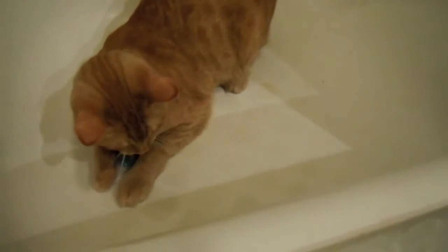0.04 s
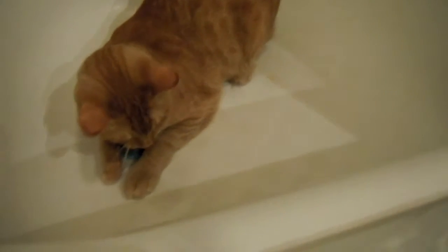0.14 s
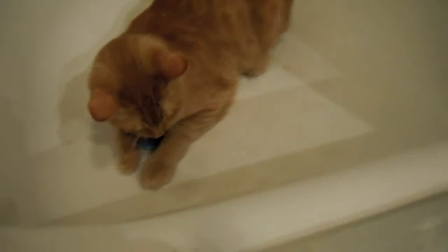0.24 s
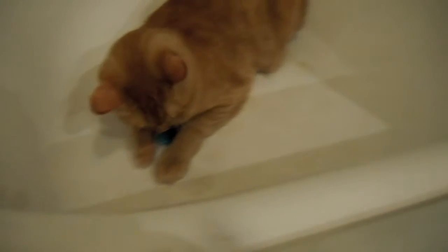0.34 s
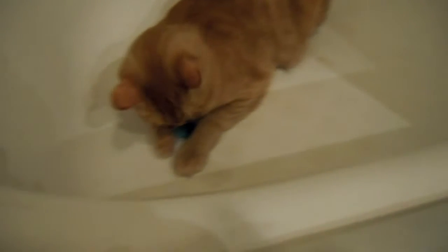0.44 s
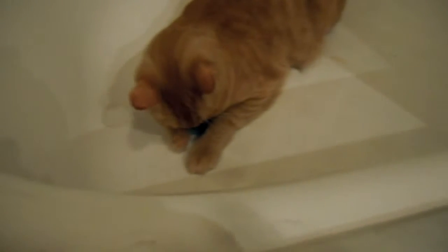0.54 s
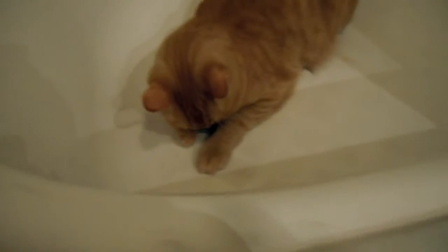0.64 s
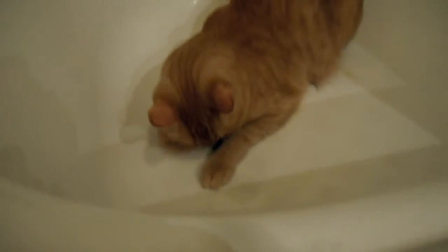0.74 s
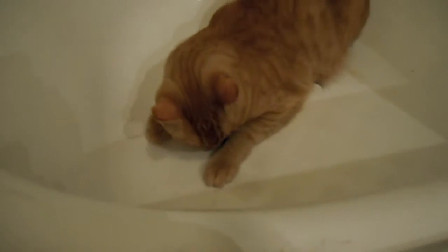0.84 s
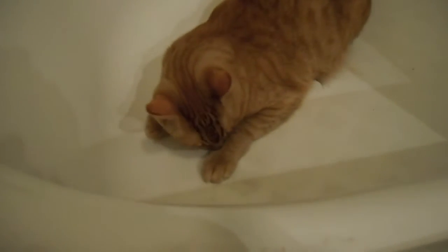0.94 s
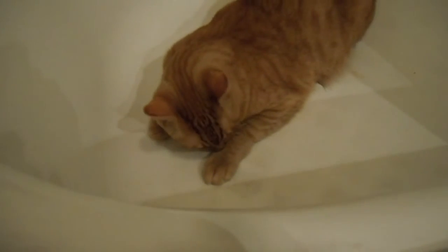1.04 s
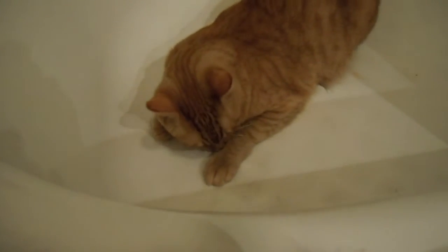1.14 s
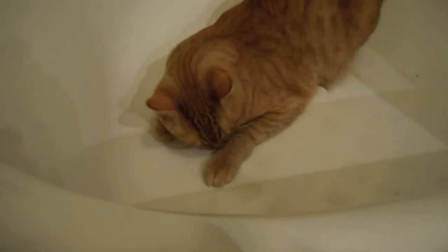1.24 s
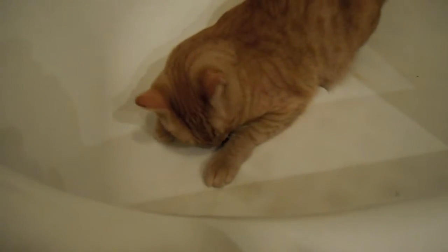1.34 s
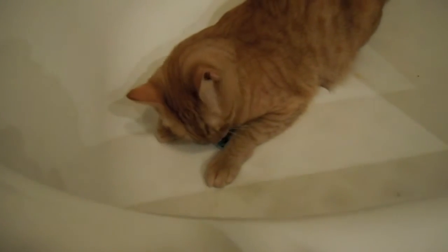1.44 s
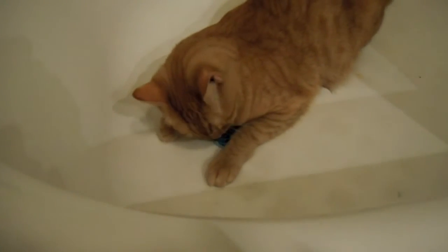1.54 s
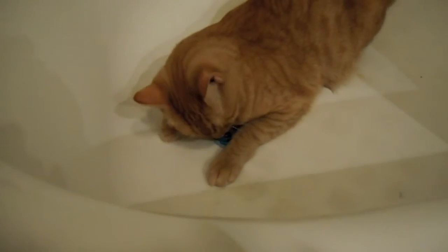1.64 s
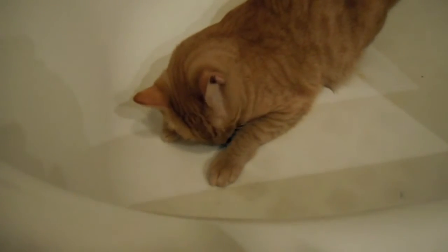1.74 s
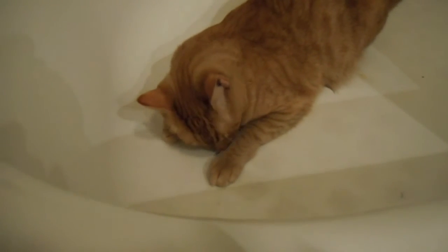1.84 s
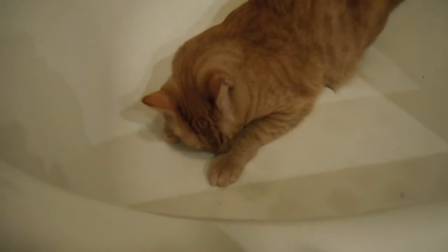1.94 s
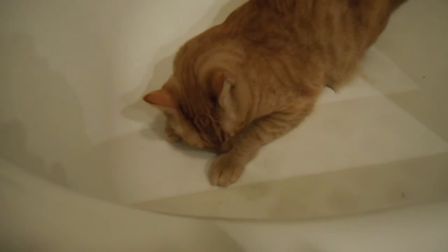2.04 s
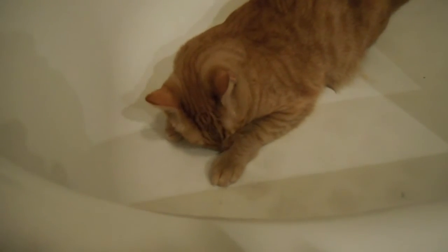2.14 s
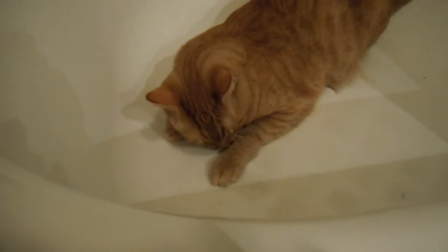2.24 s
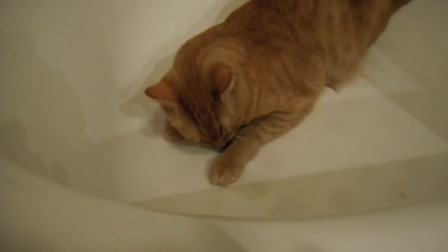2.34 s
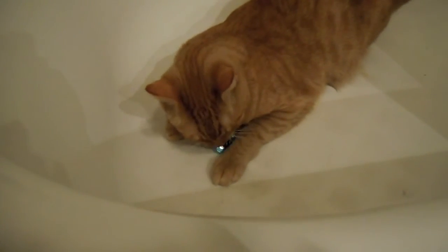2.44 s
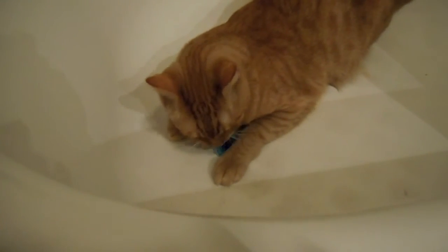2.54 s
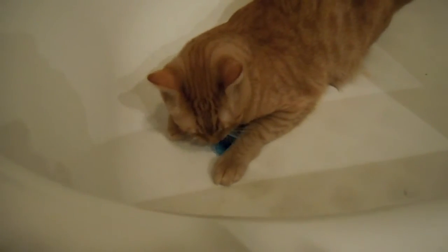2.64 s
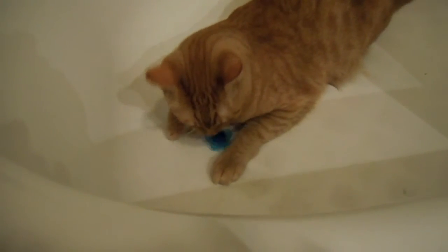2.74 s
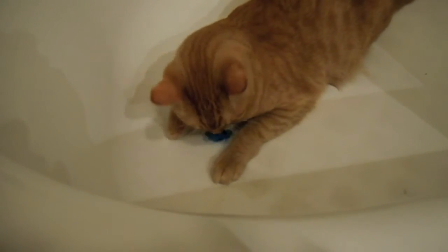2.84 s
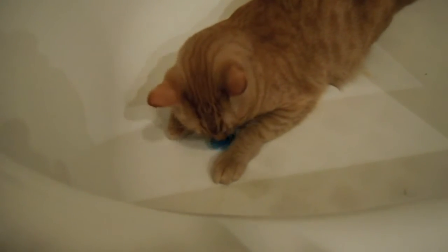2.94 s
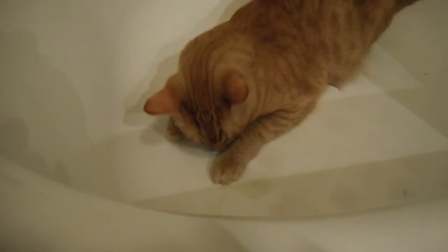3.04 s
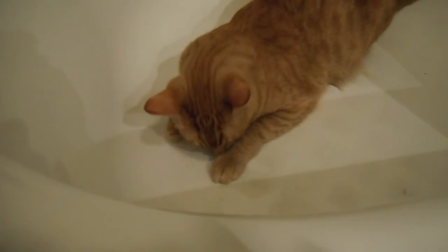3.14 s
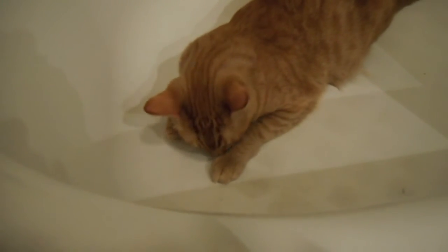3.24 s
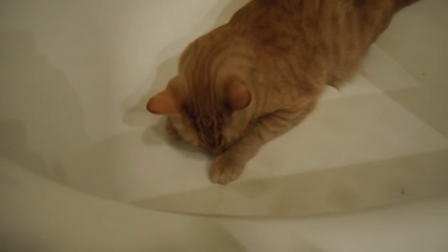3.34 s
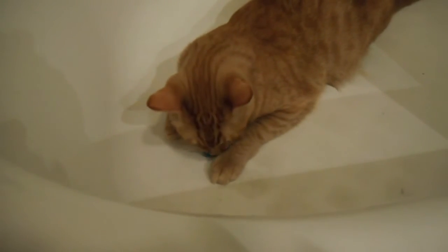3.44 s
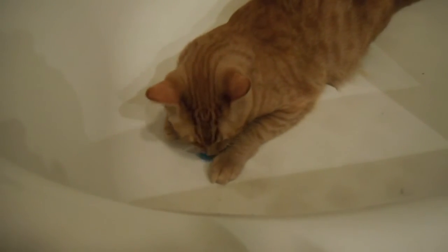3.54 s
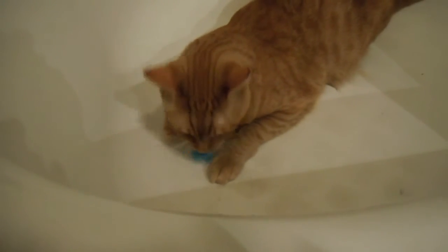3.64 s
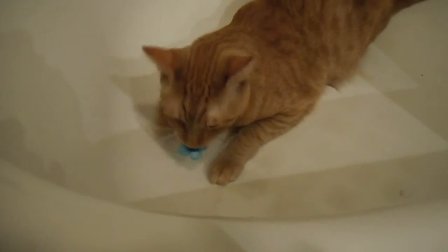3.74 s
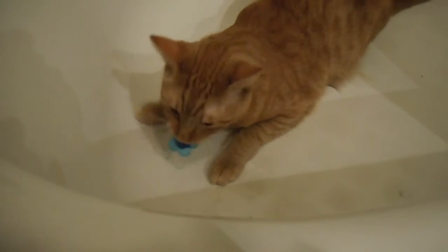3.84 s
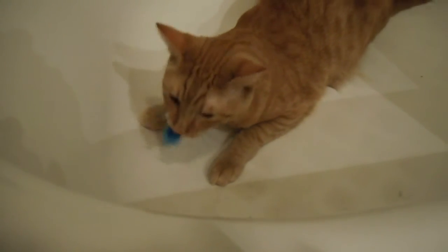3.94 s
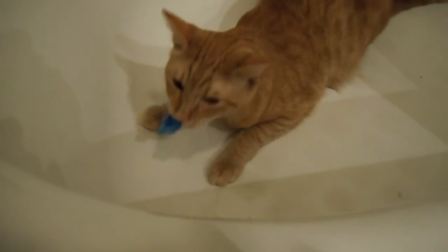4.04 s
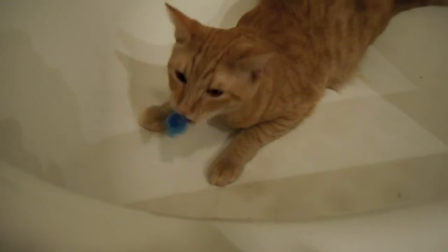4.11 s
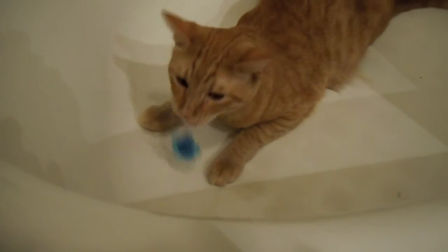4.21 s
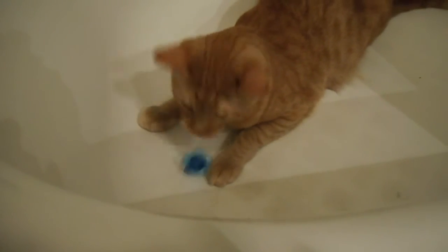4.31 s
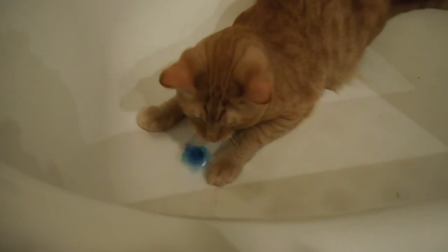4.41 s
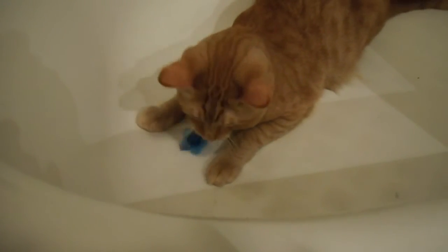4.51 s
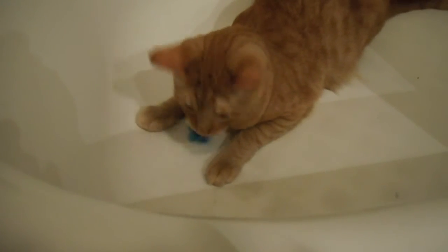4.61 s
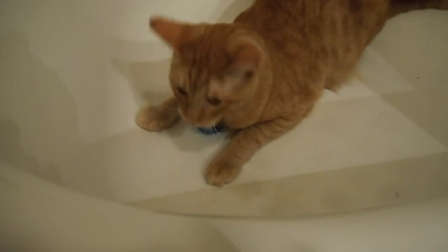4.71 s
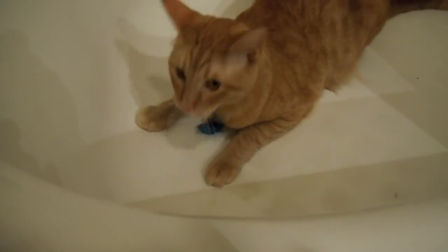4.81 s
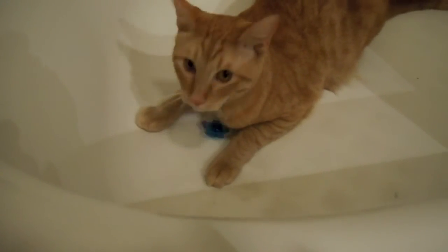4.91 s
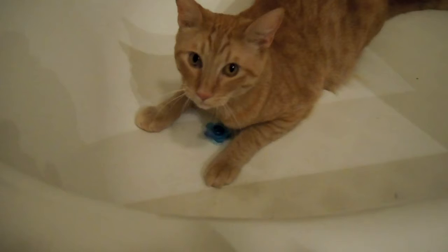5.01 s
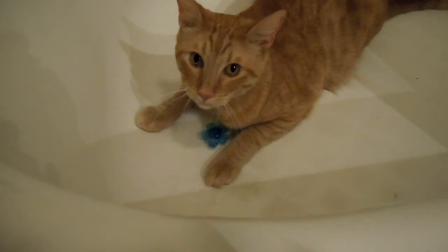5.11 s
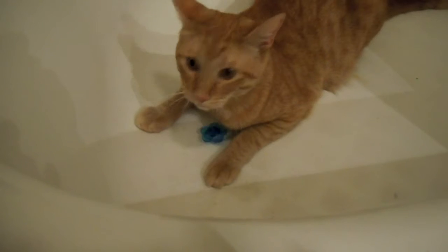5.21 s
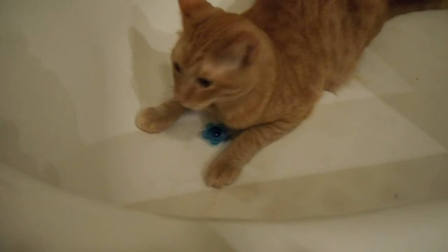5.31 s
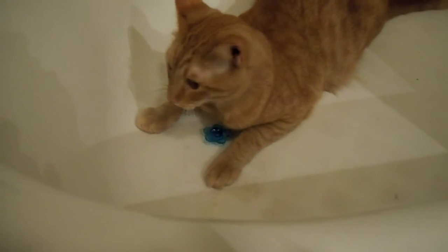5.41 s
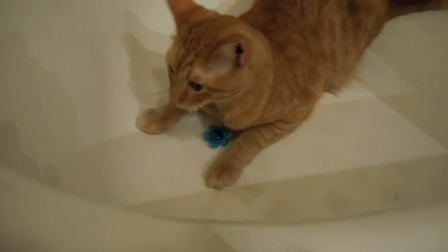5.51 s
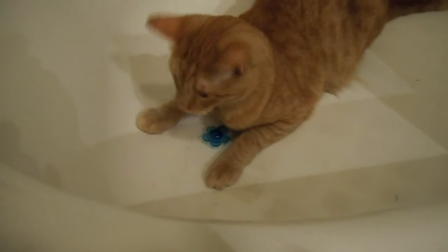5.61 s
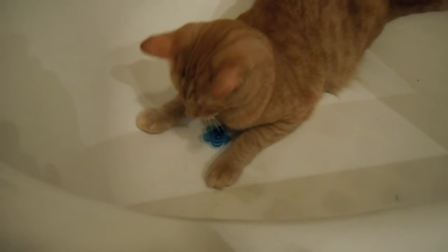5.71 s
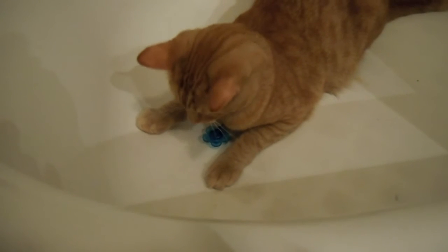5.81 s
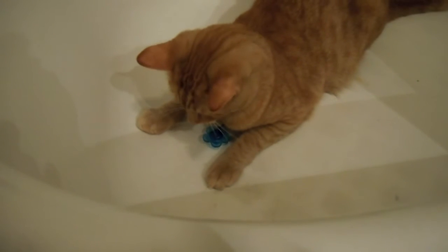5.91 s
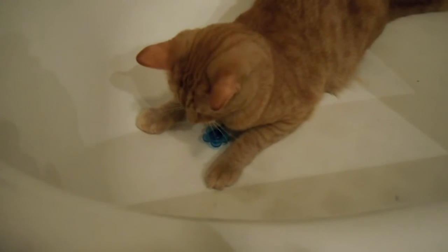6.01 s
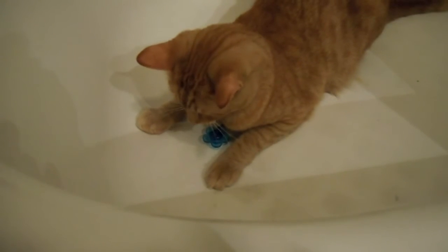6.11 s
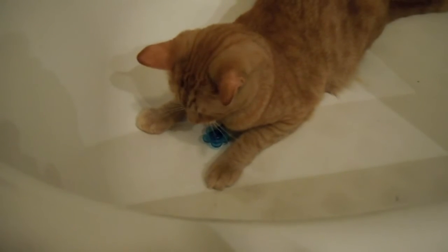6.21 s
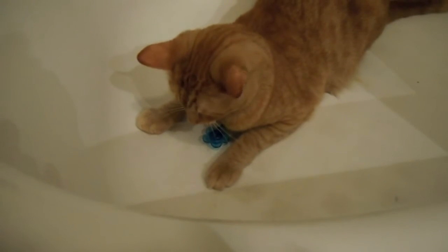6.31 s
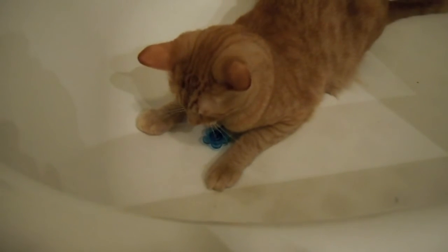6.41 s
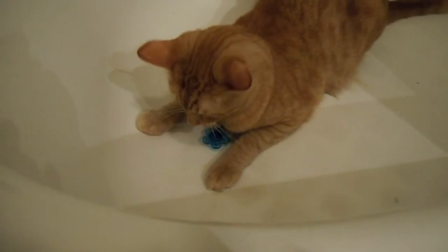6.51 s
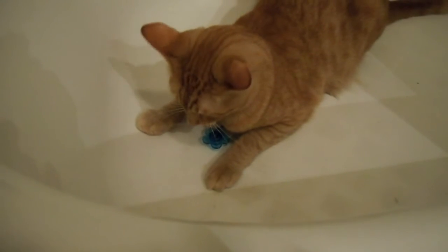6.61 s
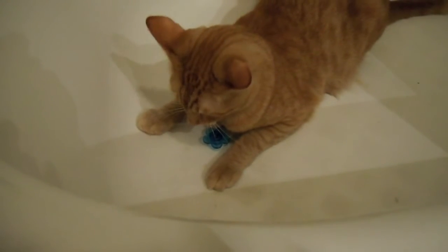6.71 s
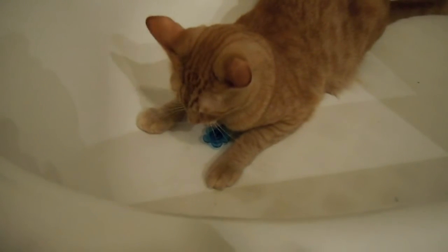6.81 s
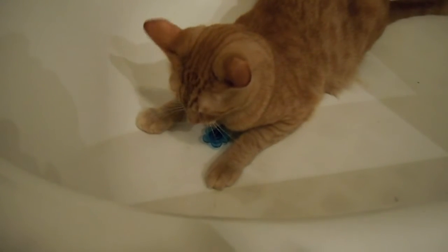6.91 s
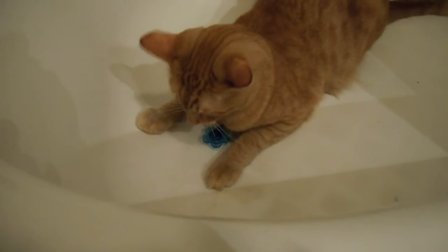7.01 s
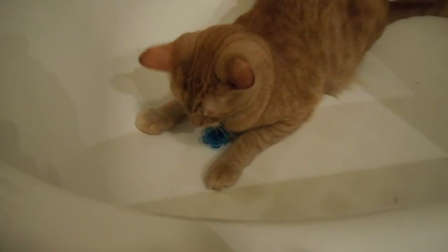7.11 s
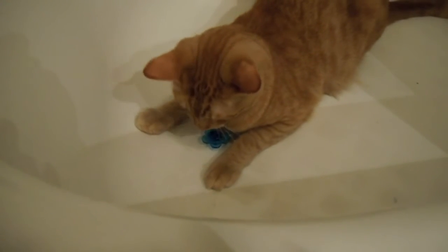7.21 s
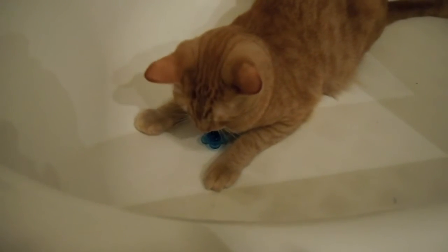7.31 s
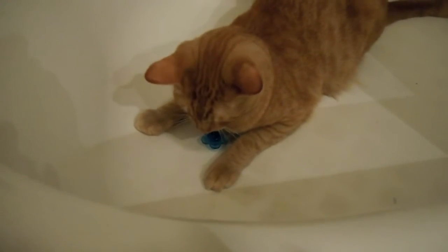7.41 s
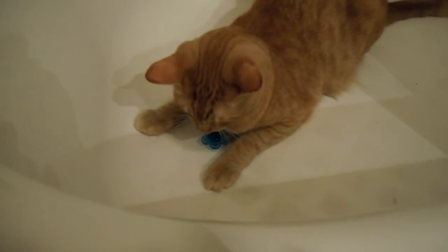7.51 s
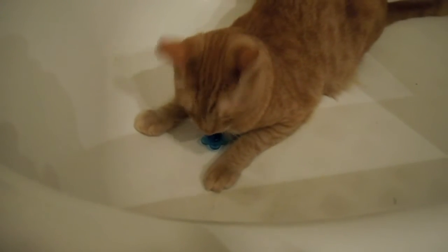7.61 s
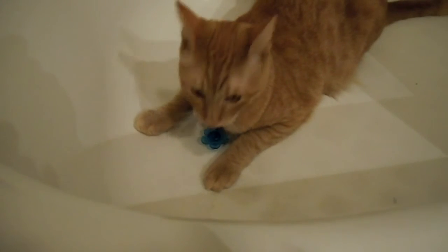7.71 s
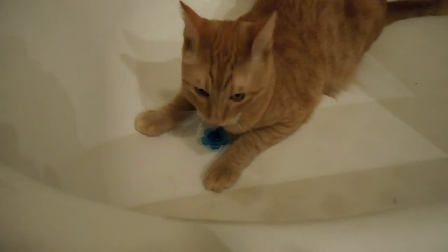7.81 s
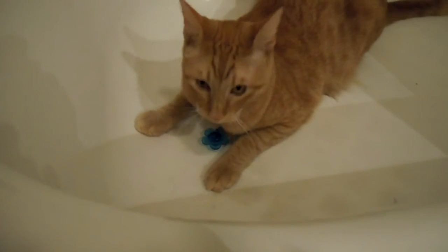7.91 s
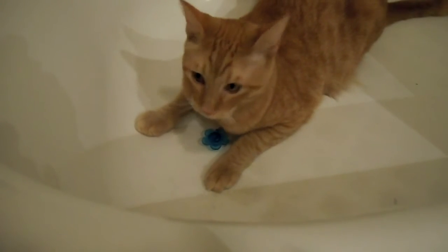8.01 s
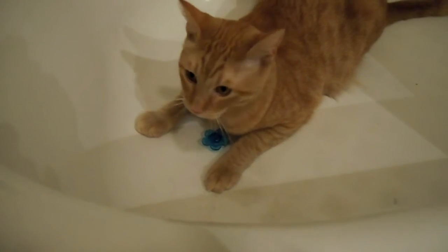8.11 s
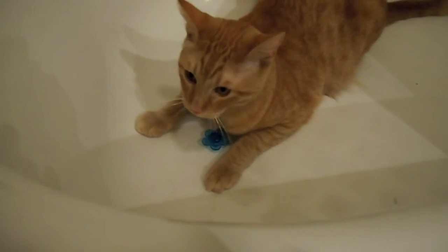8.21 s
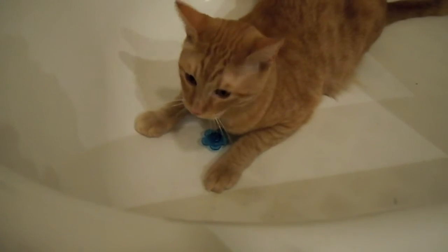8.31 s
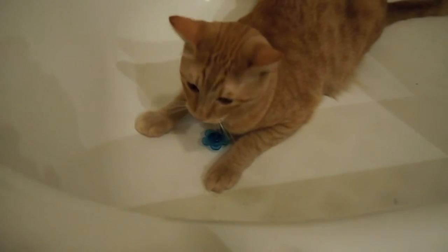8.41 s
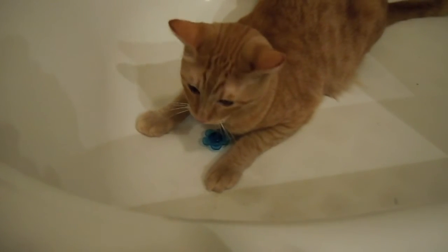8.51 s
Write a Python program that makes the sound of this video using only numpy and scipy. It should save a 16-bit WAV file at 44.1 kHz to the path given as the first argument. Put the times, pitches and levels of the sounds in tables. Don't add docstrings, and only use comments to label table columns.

```python
import sys
import numpy as np
from scipy import signal
from scipy.io import wavfile
from scipy.ndimage import uniform_filter1d

SR = 44100
rng = np.random.default_rng(int(sys.argv[2]) if len(sys.argv) > 2 else 0)


def wav_record(signal):
    frames = np.transpose(np.atleast_2d(signal))
    bounded = np.clip(frames, -1, 1)
    quanta = np.round(bounded * 32767).astype(np.int16)
    wavfile.write(sys.argv[1], SR, quanta)


def to_linear_factor(level_db):
    exponent = np.asarray(level_db, float) / 20
    return 10 ** exponent


N = 377055
LEAD_SAMPLES, RING_SAMPLES = 4410, 6000

# start_s, crack_db
DROP = (4.2908, 25.4)
DROP_S, DROP_DB = DROP


def read(points, hz):
    point_hz, value = np.transpose(points)
    return np.interp(np.log(hz + 1), np.log(point_hz + 1), value)


def evened(x):
    return x / np.sqrt(np.mean(x ** 2) + 1e-20)


def camera_db(t):
    rest_db, early_dip_db, duck_db = 1.19, 3, 13
    fall_s, hold_until_s, recover_s = 0.27, 5.07, 0.74
    early = np.exp(-np.maximum(t, 0) / recover_s)
    sink = 1 - np.exp(-np.maximum(t - DROP_S, 0) / fall_s)
    left = np.exp(-np.maximum(t - hold_until_s, 0) / recover_s)
    return rest_db - early_dip_db * early - duck_db * sink * left


def silence(*shape):
    return np.zeros((*shape, N + LEAD_SAMPLES + RING_SAMPLES))


def place(track, start_s, sound):
    at = round((start_s + .0008) * SR) + LEAD_SAMPLES
    track[at:at + len(sound)] += sound / to_linear_factor(camera_db(start_s))


def noise(db_at, patchy_db):
    # hz, correlation
    likeness = [(60, 0.84), (150, 0.97), (360, 0.99), (900, 0.98), (2200, 0.92), (5430, 0.77),
                (13400, 0.056)]
    # hz, left_minus_right_db
    balance = [(60, 1.0), (180, 2.3), (520, 1), (1540, 0.12), (4530, 0.32), (13400, 0.54)]
    hz = np.fft.rfftfreq(2048, 1 / SR)
    a, b, c, d, patches = rng.standard_normal((N // 512 + 5, 1025, 5)).T
    patches = uniform_filter1d(patches, 16, 0)
    patches = evened(uniform_filter1d(patches, 8, 1))
    same = np.clip(read(likeness, hz), 0, 1)[:, None]
    left = a + 1j * b
    right = same * left + np.sqrt(1 - same ** 2) * (c + 1j * d)
    lean_db = np.array([.5, -.5])[:, None, None] * read(balance, hz)[:, None]
    spectrum_db = db_at(hz)[:, None] + patchy_db * patches + lean_db
    bins = np.array([left, right]) * to_linear_factor(spectrum_db)
    return evened(signal.istft(bins, nperseg=2048, noverlap=1536)[1][:, :N])


def tones(lines, waver):
    t = np.arange(N) / SR
    out = np.zeros((2, N))
    for hz, db, lead_rad in lines:
        drift = np.interp(t, np.arange(100) / 10, rng.standard_normal(100))
        strength = np.sqrt(2) * to_linear_factor(db) * (1 + waver * drift)
        out += strength * np.sin(2 * np.pi * hz * t + np.array([[lead_rad], [0]]))
    return out


def click(colour):
    log_gain = np.log(to_linear_factor(read(colour, abs(np.fft.fftfreq(2048, 1 / SR)))))
    phase = -signal.hilbert(log_gain).imag
    x = np.fft.ifft(np.exp(log_gain + 1j * phase)).real[:1024]
    return x / abs(x).max()


def ring(modes, strike, detune):
    t = np.arange(RING_SAMPLES) / SR
    out = np.zeros(RING_SAMPLES)
    for (hz, db, t60_s), a, b in zip(modes, strike, detune):
        decay = to_linear_factor(db + 2.5 * a - 60 * t / t60_s)
        out += decay * np.sin(2 * np.pi * hz * (1 + 0.0023 * b) * t)
    return (1 - np.exp(-t / .0008)) * out


def fan():
    # hz, db_per_hz
    air_spectrum = [(20, -6.5), (60, -17), (110, -17.5), (200, -14.5), (330, -7.5), (450, -9), (560, -12),
                    (1100, -10), (1770, -17.5), (3500, -19.5), (5500, -23), (8700, -20.5), (11800, -28),
                    (13000, -32.5), (14000, -37)]
    # centre_hz, width_hz, boost_db
    duct_modes = [(150, 38.6, 15), (255.7, 17, 6.5), (307.5, 18, 8), (361.4, 37, 8), (429.8, 16, 11.5),
                  (647, 22, 6), (902, 15, 4), (912, 10, -11.5), (1053.5, 13.3, 10), (1117, 14, 6),
                  (1669, 17, 14.5), (2390, 70, 6)]
    # pitch_hz, level_db, left_lead_rad
    motor_lines = [(241, -53.5, .2), (366.4, -55.5, .2), (482, -56, .2), (597, -56.5, .2), (721, -56.5, .2),
                   (876, -62, .2)]
    # pitch_hz, level_db, left_lead_rad
    hum_lines = [
        (120, -50.5, -.18),
        (12855, -52.5, 1.9),
    ]

    def wash_db(hz):
        duct_db = sum(db / (1 + (2 * (hz - f) / width_hz) ** 2) for f, width_hz, db in duct_modes)
        return read(air_spectrum, hz) + duct_db

    wash = to_linear_factor(-38) * noise(wash_db, patchy_db=0.76)
    return wash + tones(motor_lines, waver=0.18) + tones(hum_lines, waver=.12)


def bumps():
    # start_s, length_s, centre_hz, width_hz, level_db
    house_bumps = [
        (3.65, .4, 160, 50, -42),
        (6.1, .4, 70, 40, -51),
        (6.05, .35, 175, 60, -49),
        (7.75, .35, 165, 50, -49),
    ]
    out = silence()
    for start_s, length_s, hz, width_hz, db in house_bumps:
        t = np.arange(round(length_s * SR)) / SR
        pole = np.exp(-np.pi * width_hz / SR)
        slow = signal.lfilter([1], [1, -pole], rng.standard_normal((2, SR)))[:, -len(t):]
        rumble = slow[0] * np.cos(2 * np.pi * hz * t) + slow[1] * np.sin(2 * np.pi * hz * t)
        place(out, start_s, to_linear_factor(db) * evened(rumble) * signal.windows.tukey(len(t), .5))
    return out


def paws():
    # start_s, level_db
    presses = [(1.057, -23.5), (1.086, -36), (1.301, -34), (2.03, -28), (2.037, -22.5), (2.065, -29),
               (2.105, -31), (2.124, -38), (2.724, -18), (3.33, -27.5), (3.36, -33)]
    # pitch_hz, level_db, t60_s
    tub_modes = [(349.4, -2, 0.27), (396.7, 0, 0.18), (620, 5, 0.031), (700, -16, 0.033), (1020, -4, 0.06)]
    out = silence()
    for start_s, db in presses:
        place(out, start_s, to_linear_factor(db - 12.5) * ring(tub_modes, *rng.standard_normal((2, 12))))
    return out


def bathroom(x):
    # hz, t60_s
    room_decay = [(200, 0.34), (600, 0.23), (1500, 0.37), (4000, 0.25), (8000, 0.25), (13000, 0.27)]
    # hz, side_below_mid_db
    echo_width = [(200, -16.5), (1000, -30), (2500, -30), (5000, -12), (9000, -3.5), (13000, -3)]
    # hz, gain_db
    echo_colour = [(200, -0.5), (1500, -0.5), (6000, -3.5), (9500, 1.5), (11500, -3.5), (14000, -9.5)]
    t = np.arange(SR // 2) / SR
    build_up = np.clip((t - .002) / 0.0046, 0, 1)
    turn_rad = np.arange(len(x)) / SR * 9.0
    out = 0
    for k in range(3):
        hz, s, (mid, side) = signal.stft(rng.standard_normal((2, len(t))), SR, nperseg=128)
        side = side * to_linear_factor(read(echo_width, hz))[:, None]
        fade_db = read(echo_colour, hz)[:, None] - 60 * s / read(room_decay, hz)[:, None]
        bins = np.array([mid + side, mid - side]) * to_linear_factor(fade_db)
        tail = signal.istft(bins, SR, nperseg=128)[1][:, :len(t)] * build_up
        tail = tail / np.linalg.norm(tail[0])
        share = np.sqrt(2 / 3) * np.cos(turn_rad + k * np.pi / 3)
        out = out + signal.fftconvolve((x * share)[None], tail, axes=1)[:, :len(x)]
    return out


def tub_walls(x):
    # delay_s, level_db
    wall_echoes = [
        (.0013, -8),
        (.0021, -10),
        (.0058, -8),
        (.0079, -14),
    ]
    return sum(to_linear_factor(db) * np.roll(x, round(delay_s * SR)) for delay_s, db in wall_echoes)


def toy():
    # start_s, tick_db, thud_db, low_ring_db, rim_db (extra upper ring,
    # landing on the rim)
    enamel_hits = [
        (-.03, -11.5, -19.5, -35, 1.5),
        (4.2908, 10.5, -15.5, -6, 6.5),
                   (1.059, -23, -27, -52, -14), (2.0367, -16, -22, -54, -18), (2.724, -12, -10, -35, -1),
                      (2.8738, -17, -32, -38, 4), (3.272, -24, -34, -54, -6), (3.2855, -23, -30, -52, -4),
                      (4.4402, -18, -14, -34, 4), (4.4469, -11, -20, -38, 2), (4.47, 2, -19, -29, 0),
                      (4.5407, -30, -34, -38, 8), (4.5625, -29, -24, -39, 6), (4.5772, -34, -34, -36, 4),
                      (4.597, -6, -23, -25, -6), (4.636, -11, -28, -33, -1), (4.6977, -28, -30, -34, 13),
                      (4.7344, -40, -29, -41, 15)]
    # start_s, tick_db, thud_db, low_ring_db
    rimless_hits = [(0.05, -28, -51, -41.5), (0.1344, -36, -44, -52), (0.3894, -46, -43, -45),
                    (2.03, -36, -34, -60), (2.1, -42.5, -31, -55), (2.5117, -31.5, -31.5, -48),
                    (2.7406, -14, -17, -44), (2.8059, -29.5, -29.5, -40), (2.829, -34, -39, -38),
                    (2.8834, -40, -27, -51), (2.9047, -34.5, -40, -47), (2.9674, -42.5, -38, -52),
                    (3.1067, -34, -37, -42), (3.2104, -44, -46, -52), (3.3294, -34.5, -28, -61),
                    (3.3544, -35, -30, -62), (3.3794, -37, -47, -63), (3.4097, -35, -34, -57),
                    (3.506, -38, -37, -55), (4.1096, -30.5, -50, -55.5), (4.1424, -36.5, -45, -50.5),
                    (4.4842, -18, -40.5, -34), (4.4763, -11, -40.5, -43), (4.9866, -36.5, -63, -53),
                    (5.01, -46.5, -57, -52), (5.3576, -49, -63, -57)]
    # pitch_hz, level_db, t60_s
    ring_groups = [
        [(3725, -8, .05), (3755, -5, .06), (3848, 0, .07), (3905, -3, .05), (5375, -24, .04)],
        [(6697, -10, .02), (7155, 0, .022), (7390, -2, .03)],
        [(9184, -8, .015), (9415, 0, .022), (9964, -9, .012), (10650, -7, .018), (12900, -12, .01)],
    ]
    # hz, level_db
    tick_colour = [(2000, -45), (5500, -24), (7200, -5), (9000, 0), (11000, -6), (13000, -12), (17000, -22)]
    # hz, level_db
    thud_colour = [(150, -31.5), (350, -4), (800, 3.5), (1500, 2.5), (3600, 1), (4500, -10), (6000, -6),
                   (9000, -23)]
    # hz, level_db
    crack_colour = [(200, -36.5), (650, -22.5), (1600, -16), (3300, -7), (4000, -4), (5200, -5), (7200, -3),
                    (9400, -4.5), (13800, -17.5), (17000, -31)]
    ticks, thuds, rings, crack = silence(4)
    tick, thud = click(tick_colour), click(thud_colour)
    for start_s, tick_db, thud_db, low_db, *rim in enamel_hits + rimless_hits:
        chance = rng.standard_normal((2, 14))
        rim_db = sum(rim)
        middle_db = -18 + 0.68 * tick_db + rim_db
        high_db = -16 + 0.78 * tick_db + 0.64 * rim_db
        stiffen = 1 + .001 * (np.clip(tick_db, -27, 0) + 12)
        modes = []
        for group, group_db in zip(ring_groups, (low_db, middle_db, high_db)):
            for hz, db, t60_s in group:
                modes.append((hz * stiffen if hz < 6000 else hz, db + group_db, t60_s))
        place(rings, start_s, ring(modes, *chance))
        chatter = np.convolve(tick, np.exp(-np.arange(28) / 12) * chance.ravel())
        place(ticks, start_s, to_linear_factor(tick_db) * chatter / abs(chatter).max())
        place(thuds, start_s, to_linear_factor(thud_db) * thud)
    place(crack, DROP_S, to_linear_factor(DROP_DB) * click(crack_colour))
    return ticks, thuds, rings, crack


def scene():
    ticks, thuds, rings, crack = toy()
    pads = paws()
    direct = ticks + crack + to_linear_factor(-4) * thuds + rings + pads
    walls = tub_walls(ticks + crack)
    left = to_linear_factor(2.5) * direct + walls
    right = to_linear_factor(0.6) * direct + np.roll(walls, shift=1)
    to_room = to_linear_factor(-0.5) * ticks + to_linear_factor(1.0) * crack + to_linear_factor(10.0) * thuds + to_linear_factor(-2.0) * rings + pads
    heard = np.array([left, right]) + bumps() + bathroom(to_room)
    return heard[:, LEAD_SAMPLES:LEAD_SAMPLES + N] + fan()


def low_pass(x):
    return signal.sosfilt(signal.butter(12, 13960, fs=SR, output="sos"), x)


def record(dry):
    # hz, level_db
    rumble_spectrum = [(15, -3), (40, -3), (100, -0.5), (200, -9.5), (450, -13), (1000, -40)]
    # pitch_hz, level_db, left_lead_rad
    pickup_lines = [(120, -52.5, -.18)]
    gain = to_linear_factor(camera_db(np.arange(N) / SR))
    rumble = to_linear_factor(-49) * noise(lambda hz: read(rumble_spectrum, hz), patchy_db=3.7)
    circuit = rumble + tones(pickup_lines, waver=.1)
    mix = np.clip(dry * gain + circuit, -.93, .93)
    return low_pass(mix)


dry = scene()
out = record(dry)
wav_record(out)
```